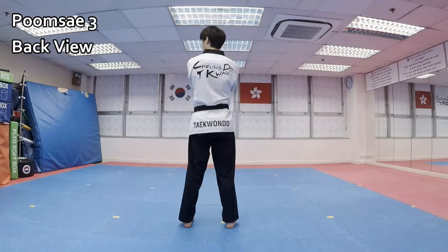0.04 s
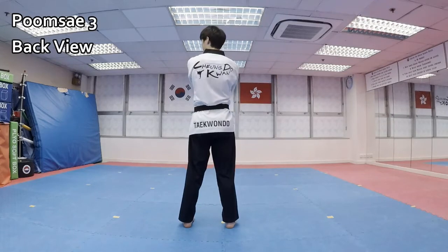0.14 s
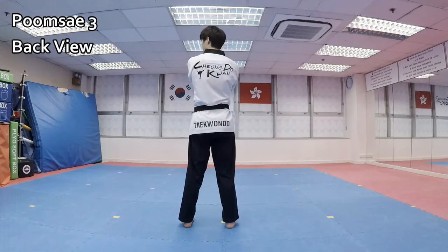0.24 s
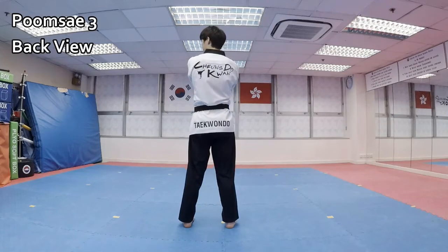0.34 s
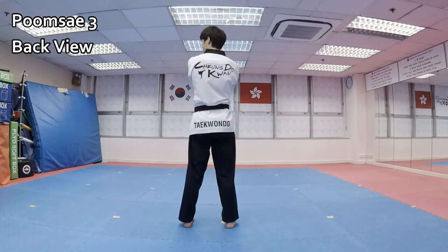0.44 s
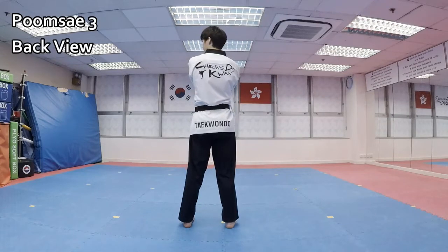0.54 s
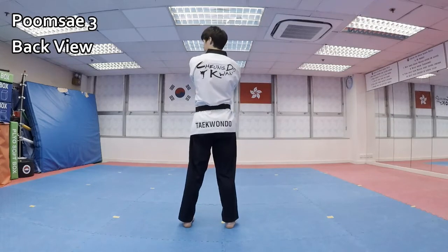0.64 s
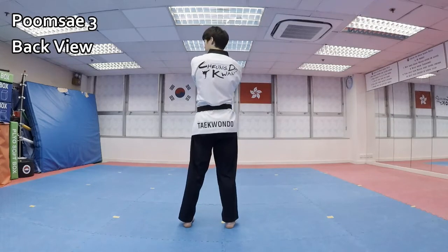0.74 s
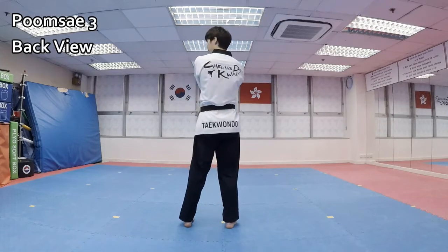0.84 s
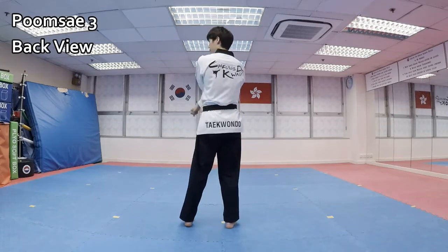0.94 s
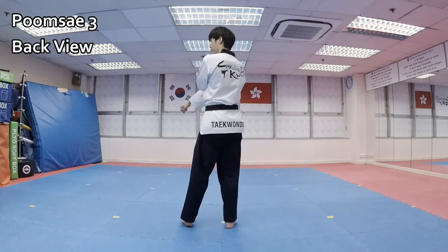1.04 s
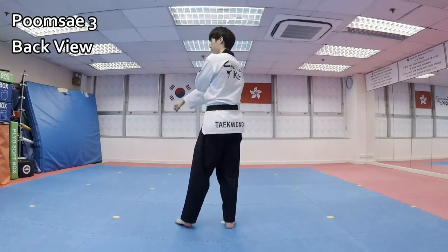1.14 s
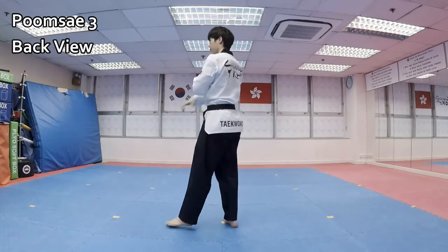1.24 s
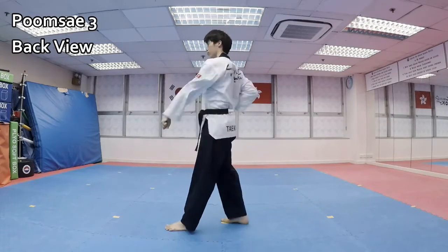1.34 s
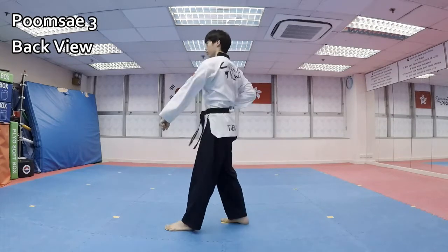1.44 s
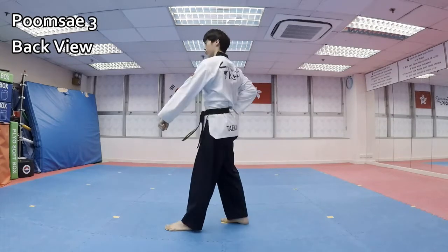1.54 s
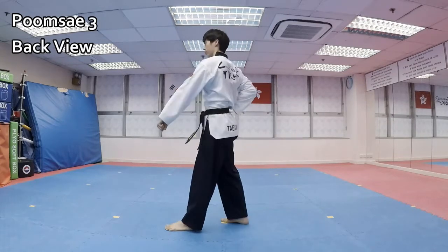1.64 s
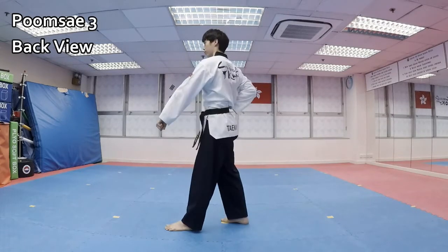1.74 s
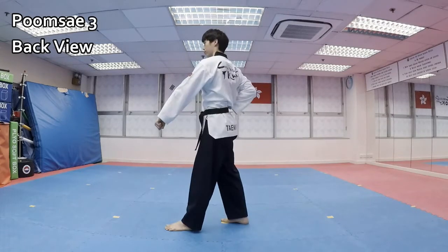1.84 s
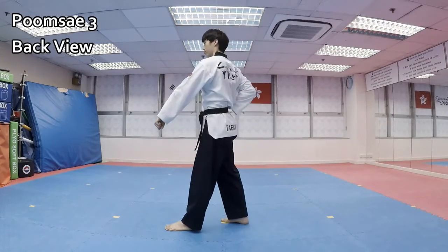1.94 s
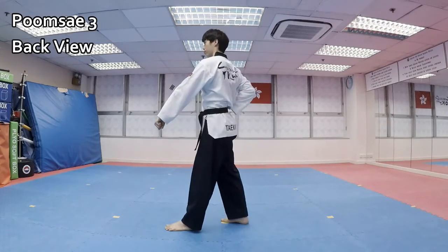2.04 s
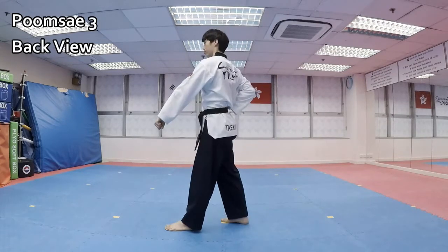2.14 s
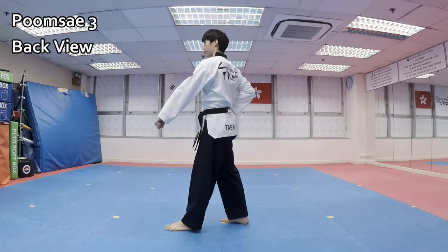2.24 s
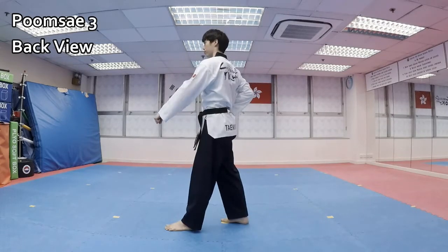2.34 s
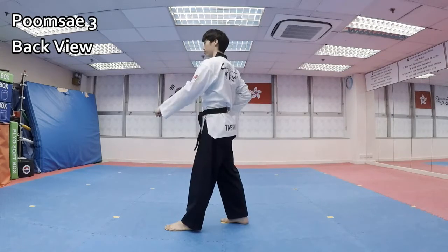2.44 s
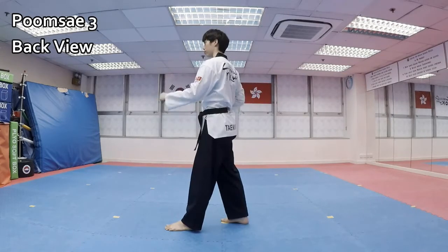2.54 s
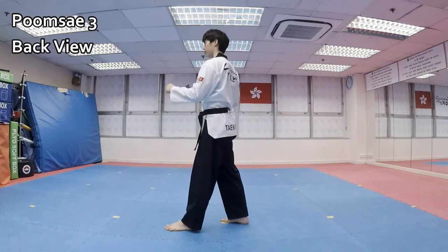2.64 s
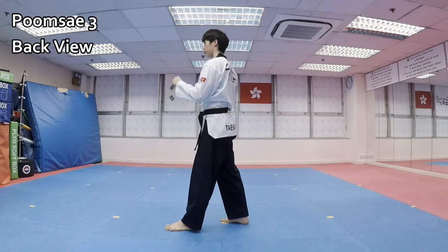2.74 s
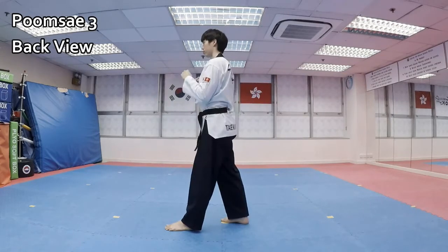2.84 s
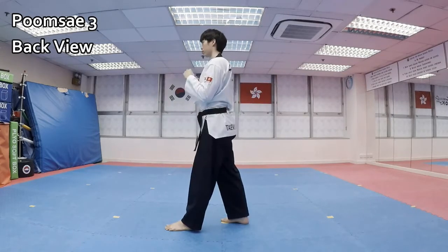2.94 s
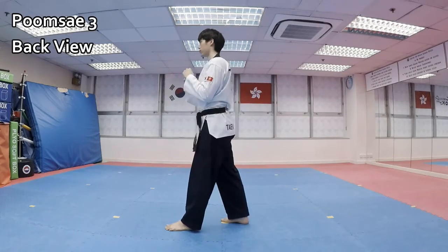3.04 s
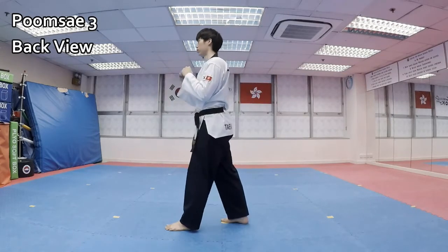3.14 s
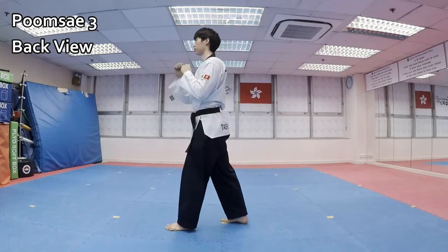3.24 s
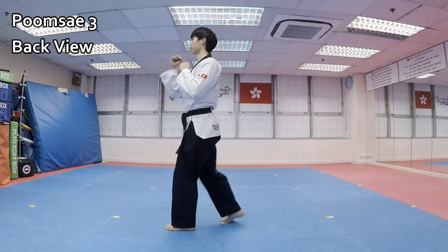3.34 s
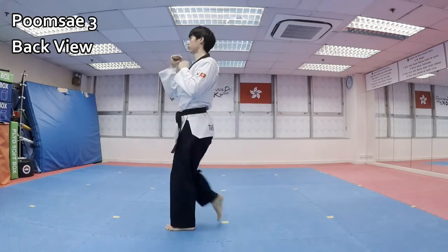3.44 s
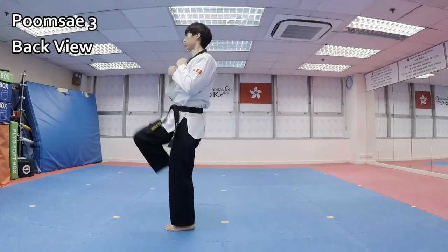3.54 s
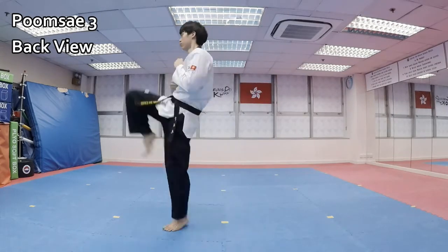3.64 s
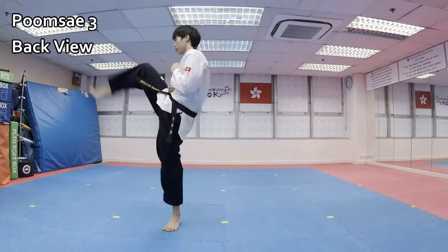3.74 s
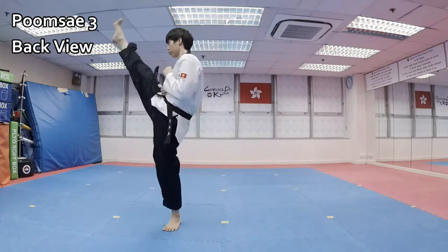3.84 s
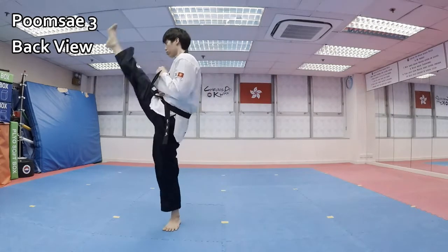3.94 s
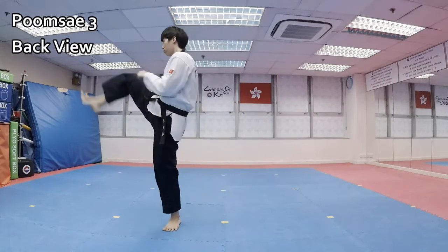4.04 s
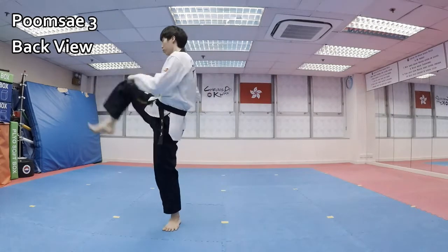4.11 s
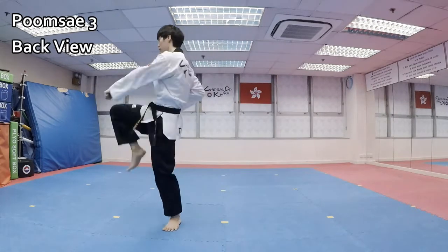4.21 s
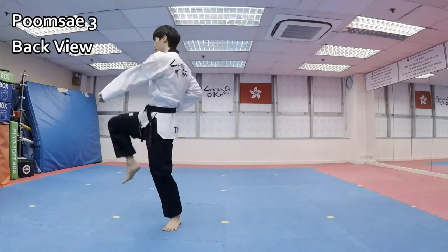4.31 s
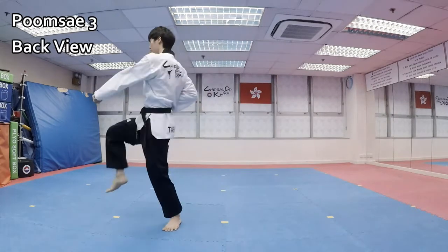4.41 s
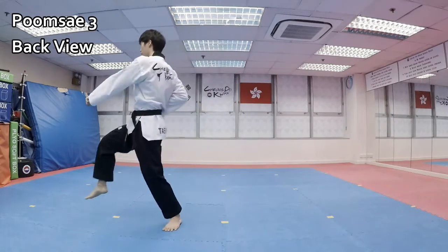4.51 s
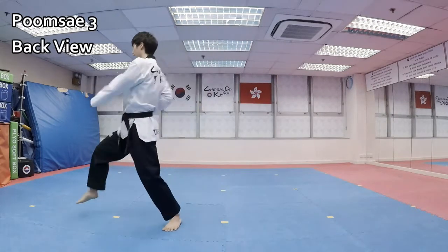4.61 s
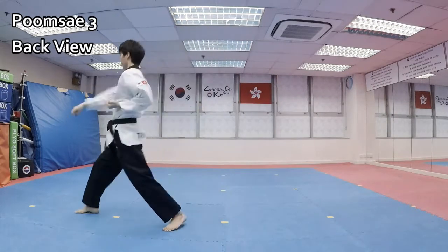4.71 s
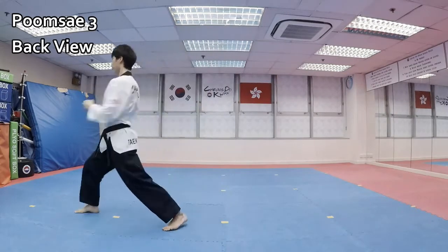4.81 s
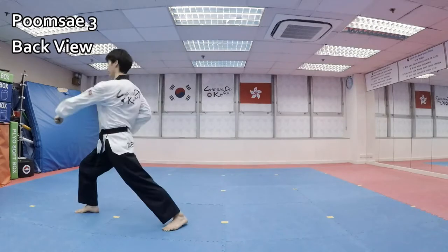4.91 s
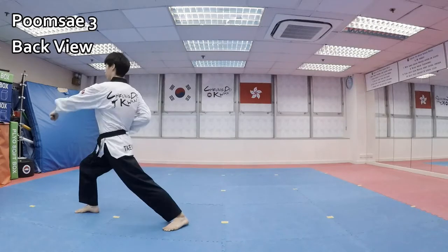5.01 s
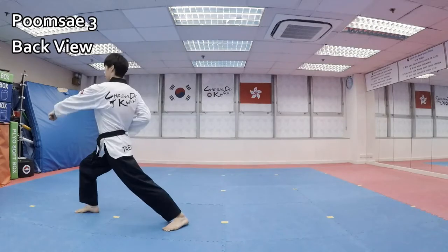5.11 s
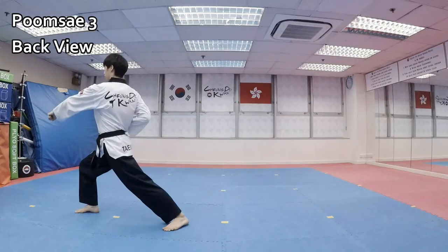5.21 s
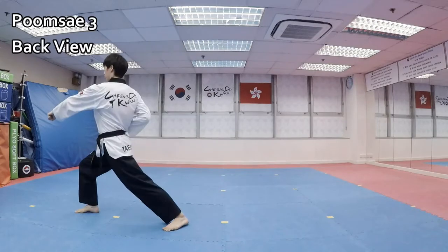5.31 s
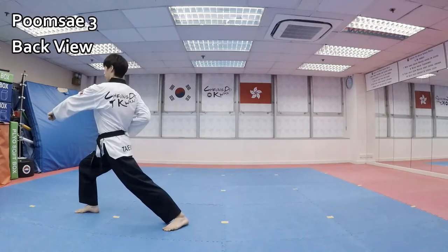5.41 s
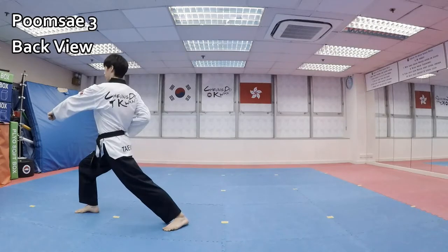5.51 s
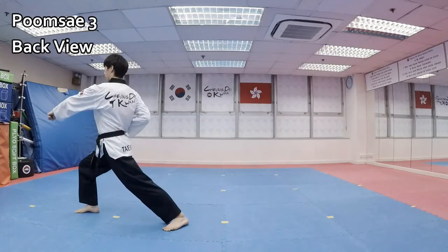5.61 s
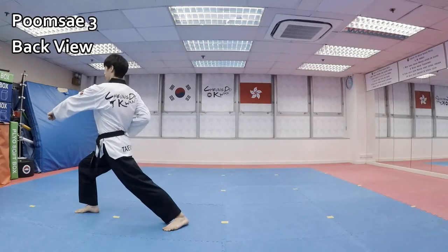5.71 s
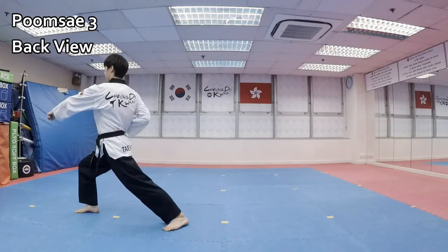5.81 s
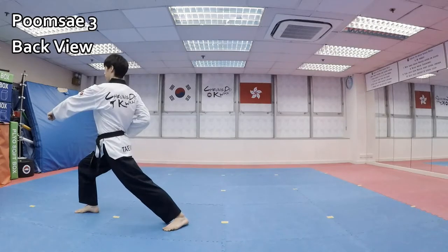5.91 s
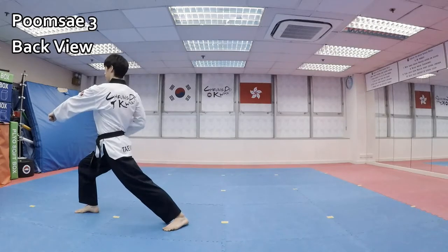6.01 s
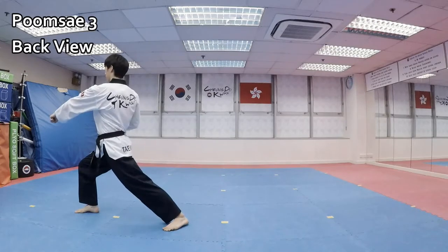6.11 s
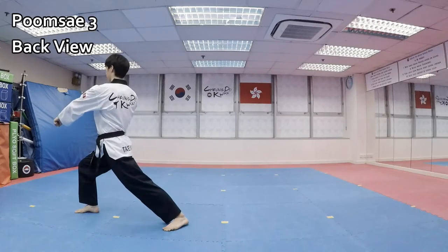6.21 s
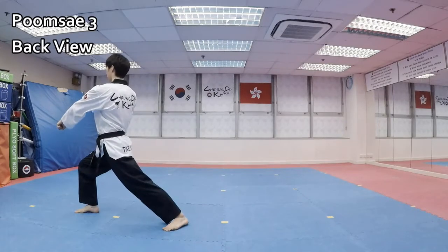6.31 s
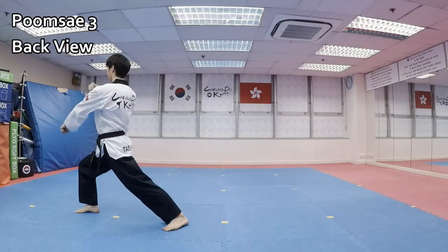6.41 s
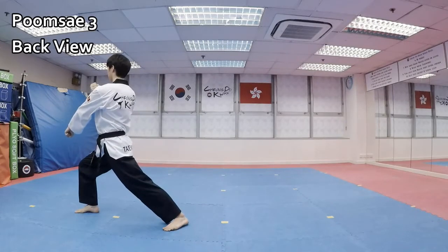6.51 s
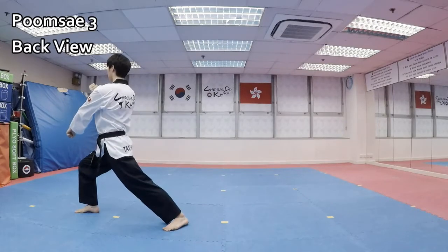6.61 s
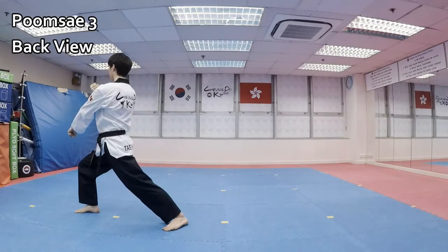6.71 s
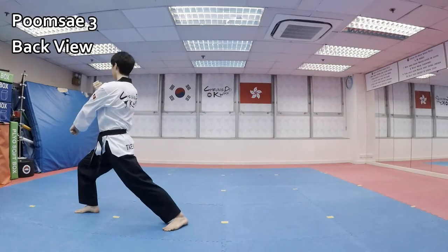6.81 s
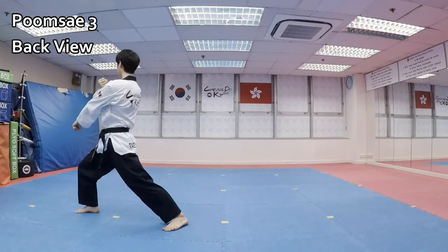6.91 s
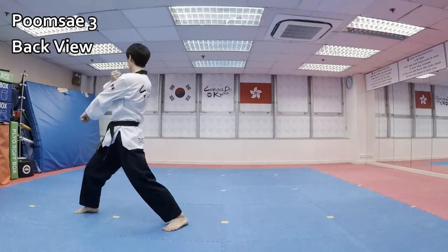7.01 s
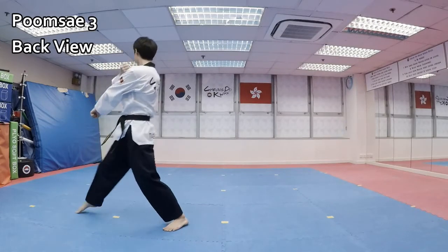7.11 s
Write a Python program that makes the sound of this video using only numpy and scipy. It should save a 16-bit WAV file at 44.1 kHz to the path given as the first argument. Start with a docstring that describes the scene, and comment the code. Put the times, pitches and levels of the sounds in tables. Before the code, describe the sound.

In an indoor training hall, ventilation rumbles under a deep wavering hum and a faint distant engine. A few metres from the microphone, an athlete's heavy cotton uniform gives one sharp flapping snap, goes still, then crackles, swishes and slaps through a quick run of a kick and a punch. After another pause with a single small tick, the cloth snaps brightly again. Each move has a brief room echo.

```python
"""A stiff cotton uniform rustles, snaps and slaps as an athlete blocks, kicks and punches on foam mats.
Weave rubs, folds flap and push air, creases pull taut, cloth hits a stopping limb; a low hall echoes it.
Behind: a deep hum swelling and fading in the hall's lowest mode, a far engine, one faint whistle,
ventilation. A small camera with two close microphone ports listens from a few metres."""
import sys
import numpy as np
from scipy import signal
from scipy.fft import rfft, irfft, next_fast_len
from scipy.io import wavfile
from scipy.ndimage import uniform_filter1d, map_coordinates

SR = 44100
rng = np.random.default_rng(int(sys.argv[2]) if len(sys.argv) > 2 else 0)


def file_out(sig):
    """Save sig as 16-bit WAV at sys.argv[1]."""
    # one column per channel
    cols = np.atleast_2d(sig).T
    # limit, then scale
    lim = np.clip(cols, -1, 1)
    pcm = np.round(lim * 32767).astype(np.int16)
    wavfile.write(sys.argv[1], SR, pcm)


N = 315756

# Levels are relative; spectra are per Hz.
# cloth swishes: peak t/s, 20 dB rise/s, 20 dB fall/s (both floored at 2 ms), rub/dB, flap/dB
SWISHES = [(0.89, -0.06, 0.14, -51.5, -55), (1.03, 0.05, 0.4, -53, -57), (1.14, 0.3, 0.15, -50, -56),
           (1.205, 0.04, 0.3, -44, -43), (1.247, 0.0268, 0.06, -39.5, -34.5),
           (1.26, 0.0081, 0.13, -36, -24), (1.329, 0.0655, 0.0668, -37.5, -30.5),
           (1.389, -0.04, 0.09, -55, -38), (2.985, 0.13, 0.35, -54, -47), (3.145, 0.12, 0.07, -60, -49),
           (3.2, 0.2, 0.2, -51, -49), (3.345, 0.04, 0.4, -54, -48), (3.5, 0.29, 0.42, -45, -43),
           (3.575, 0.09, 0.41, -38, -38.5), (3.7, 0.06, 0.11, -46, -37.5), (3.757, -0.05, 0.18, -45, -30.5),
           (3.869, 0.0646, 0.1, -39, -34.5), (4.055, 0.03, 0.32, -49.5, -47), (4.3, -0.2, 0.15, -55, -55),
           (4.39, 0.1, -0.8, -58, -52), (4.46, 0.07, 0.07, -49.5, -44), (4.61, 0.04, 0.12, -45, -41),
           (4.682, 0.0935, 0.137, -35.5, -30.5), (4.736, 0.0644, 0.2169, -41, -31),
           (4.88, 0.16, 0.07, -49, -38), (5.0, -0.5, 0.1, -56.5, -65), (5.971, 0.03, 0.2, -55.5, -47.5),
           (6.98, 0.16, 3, -55, -55), (7.095, 0.04, 0.15, -34, -43.5), (7.15, 0.13, -6, -41, -42.5)]
# weave on weave: f/Hz, level/dB
RUB_SPECTRUM = [(1180, -10.5), (2000, -17), (2800, -5), (3450, -2), (4600, 1), (5500, 1.5), (6470, 5),
                (7520, 0), (8180, -8.5), (9760, -11.5), (11200, -31), (13800, -22), (14800, -50)]
# folds slapping: f/Hz, level/dB
FLAP_SPECTRUM = [(350, -27), (600, -6), (760, -5), (836, 0.5), (900, -4), (1080, -3), (1600, -6.5),
                 (2400, -13.5), (3500, -21), (4550, -47), (7700, -120)]
# sleeve and leg pushing air: f/Hz, level/dB
BILLOW_SPECTRUM = [(120, -6.5), (200, 3.5), (300, 0), (550, 0), (800, -9.5), (1500, -46), (3000, -120)]
# creases pulled taut: t/s, level/dB, body gain/dB, upper over lower band/dB, lower band f/Hz
CREASE_SNAPS = [(0.884, -43, -4, -8, 4150), (0.961, -40, -24, -4, 5000), (1.028, -37, -5.5, 3, 3660),
                (1.201, -33, -8, -9, 3280), (2.9461, -48.5, 6, -5, 3900), (2.9705, -41.5, -8, -10, 3570),
                (3.004, -42, 2, -3, 4240), (3.0612, -47.5, 9, -3, 3600), (3.094, -48, 7, -3, 3600),
                (3.1418, -44, 0, 0, 3750), (3.162, -44.5, 4, -3, 3600), (3.1943, -43, 10, -4, 2605),
                (3.342, -42, 0, 0, 3560), (3.367, -35, -7, -3.5, 3650), (3.39, -40, -4, 2, 3660),
                (3.4003, -37, 1, -6, 4200), (3.46, -40, -4, 8, 3900), (3.4725, -35, 1, 0, 4050),
                (3.4855, -37, -1, -3, 4670), (3.498, -29, -9, 0, 4520), (3.509, -38, -9, -2, 5100),
                (3.5225, -35, 6, -2, 4350), (3.538, -38, 1, -5, 3570), (3.553, -27, -6, -2, 3510),
                (3.5579, -13.5, -10, 3, 3600), (3.594, -31, -6, 0, 3500), (3.805, -34, 3, 10, 3000),
                (3.872, -33, -4, 8, 4650), (4.0462, -46, 3, -5, 3097), (4.0594, -38, 2, -5, 4460),
                (4.079, -42, -2, -9, 3420), (4.2933, -25, -4.5, -1, 4255), (4.3748, -42, -11, 0, 4270),
                (4.3894, -40, -7, -7, 4235), (4.4106, -36, -10, -7, 4130), (4.4297, -46, 0, -8, 4000),
                (4.4448, -31.5, -6, -2, 4520), (4.458, -34, -6, 9, 4370), (4.4808, -31, -6, 1, 3800),
                (4.593, -29, 4, 0, 3470), (4.6232, -29, 0.5, -2, 4500), (4.6468, -26, -2, -13, 3790),
                (4.6532, -22, -7, -9, 3500), (4.667, -25, 1, -11, 3450), (4.679, -24, -4.5, -5, 3400),
                (4.692, -19, -9, 0, 3640), (4.9849, -39, -12, -2, 3407), (5.027, -40, -15, 0, 3290),
                (5.9558, -26.5, -20, -3, 4750), (6.9906, -33, -15, -8, 2661), (7.0165, -37, -16, 5, 3470),
                (7.074, -45, 3, -4, 3600), (7.089, -19.5, -6.5, 7, 4822), (7.0944, -23, -21, 14, 4550),
                (7.113, -32, -16, 12, 5200), (7.1267, -33, -10, 5, 4590)]
# cloth hitting a limb: t/s, level/dB, f/Hz, t60/s
LIMB_SLAPS = [(1.201, -31, 600, 0.016), (1.261, -18, 227, 0.063), (1.26, -19, 800, 0.032),
              (1.259, -29, 1660, 0.053), (1.256, -30.5, 3280, 0.044), (1.284, -18.5, 850, 0.072),
              (1.295, -15.5, 215, 0.09), (1.333, -21, 534, 0.058), (3.399, -31, 700, 0.018),
              (3.472, -26, 520, 0.019), (3.747, -19.5, 293.5, 0.061), (3.756, -19, 229, 0.1),
              (3.773, -22, 310, 0.1), (3.748, -21, 537, 0.08), (3.792, -21.5, 387, 0.037),
              (3.866, -27, 1000, 0.09), (3.9, -27, 400, 0.07), (4.045, -27, 747, 0.041),
              (4.679, -20.5, 944, 0.05), (4.71, -23, 524, 0.059), (4.734, -22, 910, 0.06),
              (4.76, -21, 400, 0.09), (4.878, -28, 480, 0.08), (5.972, -40, 1700, 0.12),
              (7.089, -26, 1150, 0.017), (7.091, -22, 520, 0.035)]
# first echoes: delay/s, level/dB
ECHOES = [(.0065, -8), (.011, -16), (.0195, -18), (.027, -19), (.036, -20)]
# hall decay: f/Hz, t60/s
HALL_T60 = [(150, 1), (500, 0.19), (2000, 0.25), (6000, 0.59), (12000, 0.65)]
# lowest hall mode: t/s, f/Hz, level/dB
HUM_TRACK = [(0.0, 46.8, -32), (0.16, 50.46, -35), (0.82, 46.52, -37.5), (1.21, 50.6, -19.5),
             (1.31, 50.6, -19.5), (1.56, 49.12, -32), (1.62, 50.33, -24.5), (1.67, 49.9, -36.5),
             (1.99, 50.7, -19.5), (2.21, 50.7, -28.5), (2.43, 50.44, -16.5), (2.47, 50.13, -29),
             (2.65, 51.5, -28), (3.01, 49.3, -20.5), (3.63, 49.2, -19), (3.75, 50.53, -27),
             (4.03, 51.1, -16.5), (4.19, 51.8, -31.5), (4.55, 51.54, -23.5), (4.95, 50.33, -25.5),
             (5.08, 50.77, -16.5), (6.24, 49.04, -27.5), (6.3, 49.93, -36.5), (6.84, 52.1, -21),
             (7.04, 53.14, -39), (7.16, 52.84, -23)]
# engine pulling away twice, dropping back at the gear change: t/s, f/Hz, level/dB
ENGINE_TRACK = [(0.0, 70.5, -47), (1.0, 66.8, -42), (1.7, 57.7, -61), (2.0, 59.5, -40), (2.3, 63, -36),
                (2.6, 65.87, -39), (3.3, 67.09, -28), (4.2, 69.95, -40), (4.35, 58.04, -41),
                (4.7, 60.1, -35), (5.3, 63.95, -36.5), (5.7, 67.95, -28), (6.15, 71.1, -24.5),
                (6.5, 73.21, -32), (7.16, 77.64, -35.5)]
# weaker engine tones: pitch ratio, level/dB
ENGINE_ORDERS = [(1.252, -16.5), (1.502, -38)]
# fan tones: f/Hz, width/Hz, level/dB
FAN_TONES = [(148.3, 4.6, -45), (230.2, 11, -55.5), (1133, 47, -66)]
# ventilation noise: f/Hz, level/dB
AIR_SPECTRUM = [(15, -35), (24, -4.5), (35, -8), (50, 3.5), (75, -9.5), (92, -14), (155, -26), (180, -27.5),
                (386, -38), (1040, -43.5), (1250, -44), (1600, -52), (2500, -55.5), (3500, -62.5),
                (4500, -63), (5400, -62.5), (6500, -60.5), (10400, -63), (14800, -76.5)]
# its likeness at the two ports: f/Hz, correlation
AIR_CORRELATION = [(60, 0.93), (150, 1), (370, 0.31), (930, -0.55), (2320, 0.18), (5770, 0.21),
                   (14400, -0.257)]
# its low end: t/s, level/dB
RUMBLE_TRACK = [(0.0, -30.5), (0.4, -33.5), (1.3, -28.5), (1.9, -31), (3.2, -30), (4.4, -28), (5.2, -28.5),
                (6.7, -26.5), (7.16, -25)]


def cloth_rustle(flutter_db=1.5, flutter_per_s=70, pivot_db=-41.5, billow_slope=1.26):
    """Each swish rubs and flaps the loose cloth; harder flaps push more air."""
    powers = np.array([swell(*row[:3]) for row in SWISHES])
    rub_db, flap_db = np.transpose(SWISHES)[3:]
    billow_db = pivot_db + billow_slope * (flap_db - pivot_db)
    envelope = lambda db: np.sqrt(amp(db) ** 2 @ powers)
    rub = envelope(rub_db) * coloured(crackle(ticks_per_s=800, spread_db=4.0), RUB_SPECTRUM)
    flap = envelope(flap_db) * coloured(crackle(ticks_per_s=900, spread_db=1.5), FLAP_SPECTRUM)
    billow = envelope(billow_db) * coloured(rng.standard_normal(N), BILLOW_SPECTRUM)
    flutter = lambda: amp(flutter_db * wobble(flutter_per_s))
    return flutter() * rub + flutter() * (flap + billow)


def crackle(ticks_per_s, spread_db, tick_share=0.3, width=0.51):
    """Tiny creases: uneven ticks over smooth noise that partly differs between ports."""
    ticks = (rng.random(N) < ticks_per_s / SR) * rng.standard_normal(N)
    ticks *= amp(spread_db * rng.standard_normal(N))
    smooth = rng.standard_normal(N) * np.sqrt(1 - width) + rng.standard_normal((2, N)) * np.sqrt(width)
    return unit(unit(ticks) * np.sqrt(tick_share) + smooth * np.sqrt(1 - tick_share))


def crease_snaps(fold_hz=1040, bright_hz=6400, edge_db=-28, top_hz=8100):
    """A crease pulls taut: a frayed jolt rings two bright bands over the fold's duller body."""
    out, t = np.zeros(N + 400), np.arange(400) / SR
    attack = (1 - np.exp(-t / 0.00012)) ** 2
    ring = lambda hz, width_hz: np.sin(2 * np.pi * hz * t) * np.exp(-np.pi * width_hz * t) * attack
    for start_s, db, body_db, tilt_db, lower_hz in CREASE_SNAPS:
        fray = rng.standard_normal(len(t))
        jolt = 0.18 * fray * amp(-60 * t / 0.007)
        jolt[0] = 1
        body_hz = fold_hz * np.exp(0.14 * np.tanh(fray[0]))
        upper_hz = bright_hz * np.exp(0.05 * np.tanh(fray[1]))
        lower = amp(-tilt_db / 2) * ring(lower_hz, width_hz=1400)
        upper = amp(tilt_db / 2) * ring(upper_hz, width_hz=1600)
        bands = np.convolve(jolt, lower - upper)[:len(t)]
        # derivative: a small fold radiates no bass
        body = np.gradient(ring(body_hz, 0.46 * body_hz)) * SR / (2 * np.pi * body_hz)
        edge = amp(edge_db) * np.diff(jolt, prepend=0)
        out[round(start_s * SR):][:len(t)] += amp(db + 9.0) * (bands + amp(body_db + 4.5) * body + edge)
    soft_fibres = signal.butter(1, top_hz, output='sos', fs=SR)
    return signal.sosfilt(soft_fibres, out[:N])


def limb_slaps(band_ratio=1.45, attack_s=0.00083):
    """Cloth hits a limb that stops hard: a short push plus a noise puff around its pitch."""
    out, t = np.zeros(N + SR), np.arange(SR // 4) / SR
    for start_s, db, hz, t60_s in LIMB_SLAPS:
        band = signal.butter(3, [hz / band_ratio, hz * band_ratio], 'bandpass', output='sos', fs=SR)
        puff = unit(signal.sosfilt(band, rng.standard_normal(len(t))))
        push = np.sin(2 * np.pi * hz * t)
        envelope = amp(db - 60 * t / t60_s) * (1 - np.exp(-t / attack_s))
        out[round(start_s * SR):][:len(t)] += envelope * (0.9 * push + 0.8 * puff)
    return out[:N]


def hall(x, tail_db):
    """Direct sound, echoes off mat, ceiling and walls, and a tail with frequency-dependent decay."""
    hz, t, noise = signal.stft(rng.standard_normal((2, SR * 3 // 4)), SR, nperseg=256)
    tail = signal.istft(noise * amp(-60 * t / along(HALL_T60, hz)[:, None]), SR, nperseg=256)[1]
    response = np.pad(amp(tail_db) * tail / np.linalg.norm(tail[0]), ((0, 0), (300, 0)))
    for k, (delay_s, db) in enumerate(ECHOES):
        at = round(delay_s * SR)
        skew = 6 * (-1) ** k  # side echoes reach one port first
        response[[0, 1], [at + skew, at - skew]] += amp(db)
    return x + signal.fftconvolve(x, response, axes=1)[:, :N]


def hall_hum():
    """The hall's lowest mode swells and fades."""
    hz, db = curves(HUM_TRACK)
    return tone(hz, db + waver_db())


def far_engine():
    """A gliding, wavering drone with two weaker tones above it."""
    hz, db = curves(ENGINE_TRACK)
    smooth_db = uniform_filter1d(db, size=9000)
    orders = sum(tone(ratio * hz, smooth_db + order_db) for ratio, order_db in ENGINE_ORDERS)
    return tone(hz, db + waver_db()) + orders


def fan():
    """Wavering fan tones, independent at each port."""
    return sum(amp(db) * narrow_noise((2, N), hz, width_hz) for hz, width_hz, db in FAN_TONES)


def whistle(peak_s=0.83, sigma_s=0.2, peak_db=-70):
    """A thin, unsteady tone that comes and goes once."""
    bell = np.exp(-((np.arange(N) / SR - peak_s) / sigma_s) ** 2 / 2)
    return amp(peak_db) * bell * narrow_noise(N, hz=2410, width_hz=8.1)


def ventilation(hiss_db, treble_db, patchy_db, hiss_slope=0.71):
    """Patchy air noise: swelling rumble, hiss that follows it, steady treble."""
    noise = signal.stft(rng.standard_normal((2, N)), nperseg=512)[2]
    patches = uniform_filter1d(rng.standard_normal(noise.shape[1:]), size=6, axis=0)
    patches = uniform_filter1d(patches, size=14, axis=1)
    pair = signal.istft(noise * amp(patchy_db * unit(patches)), nperseg=512)[1][:, :N]
    low = lambda hz: 1 / (1 + (hz / 170) ** 4)
    high = lambda hz: 1 - 1 / (1 + (hz / 3495) ** 4)
    rumble = air_band(pair, lambda hz: low(hz) * abs(1 - .7 * resonance(hz, 55, 30)))  # dip near the hum
    hiss = air_band(pair, lambda hz: 1 - low(hz) - high(hz))
    treble = air_band(pair, high)
    rumble_db, = curves(RUMBLE_TRACK)
    follow_db = hiss_slope * (rumble_db - rumble_db.mean())
    return amp(rumble_db) * rumble + amp(hiss_db + follow_db) * hiss + amp(treble_db) * treble


def air_band(pair, band):
    """One band of air noise at both ports: alike in the bass, mostly unrelated in the treble."""
    def mid_side(hz):
        angle = np.arccos(np.clip(along(AIR_CORRELATION, hz), -1, 1)) / 2
        return band(hz) * amp(along(AIR_SPECTRUM, hz)) * [np.cos(angle), np.sin(angle)]
    mid, side = filtered(pair, mid_side)
    return unit(np.array([mid + side, mid - side]))


def amp(db):
    """dB to gain."""
    return 10 ** (np.asarray(db) / 20)


def unit(x):
    """x at rms 1."""
    return x / np.sqrt(np.mean(x ** 2) + 1e-20)


def along(points, hz):
    """Interpolate (f/Hz, value) points on a log axis."""
    f, values = np.transpose(points)
    return np.interp(np.log(hz + 1), np.log(f + 1), values)


def curves(rows):
    """One per-sample curve for each column after t/s."""
    times_s, *columns = np.transpose(rows)
    return [np.interp(np.arange(N) / SR, times_s, column) for column in columns]


def filtered(x, response):
    """x through a complex frequency response."""
    size = next_fast_len(N + SR // 2)
    return irfft(rfft(x, size) * response(np.fft.rfftfreq(size, 1 / SR)), size)[..., :N]


def coloured(x, spectrum):
    """x shaped by a spectrum table, rms 1."""
    return unit(filtered(x, lambda hz: amp(along(spectrum, hz))))


def resonance(f, hz, width_hz):
    """Causal peak of gain 1."""
    return 1j * f * width_hz / (hz * hz - f * f + 1j * f * width_hz)


def narrow_noise(shape, hz, width_hz):
    """Noise heard as an unsteady tone, rms 1."""
    return unit(filtered(rng.standard_normal(shape), lambda f: resonance(f, hz, width_hz) ** 2))


def tone(hz, rms_db):
    """Sine on pitch and level curves."""
    return np.sqrt(2) * amp(rms_db) * np.sin(2 * np.pi * np.cumsum(hz) / SR)


def swell(peak_s, rise_s, fall_s):
    """Power envelope, linear in dB: 20 dB per rise or fall time."""
    t = np.arange(N) / SR - peak_s
    return np.exp(np.log(100) * np.where(t < 0, t / max(rise_s, .002), -t / max(fall_s, .002)))


def wobble(knots_per_s):
    """Smooth random curve."""
    knots = rng.standard_normal(int(N * knots_per_s / SR) + 4)
    return map_coordinates(knots, [np.arange(N) * knots_per_s / SR])


def waver_db():
    """Random level drift of a drone."""
    return 1.45 * wobble(knots_per_s=9)


def scene():
    """The uniform in the hall over the building's noise."""
    uniform = hall(cloth_rustle() + crease_snaps() + limb_slaps(), tail_db=-7.0) * amp(-2.5)
    drones = (hall_hum() + far_engine()) * amp([[.25], [-.25]])  # near equal at both ports
    return uniform + drones + fan() + whistle() + ventilation(hiss_db=-44, treble_db=-60.5, patchy_db=1.0)


def record(dry, limit_hz=14900):
    """Microphone presence peak and camera band limit."""
    return filtered(dry, lambda hz: (1 + .5 * resonance(hz, 3590, width_hz=640)) * (hz < limit_hz))


dry = scene()
out = record(dry)
file_out(out)
```